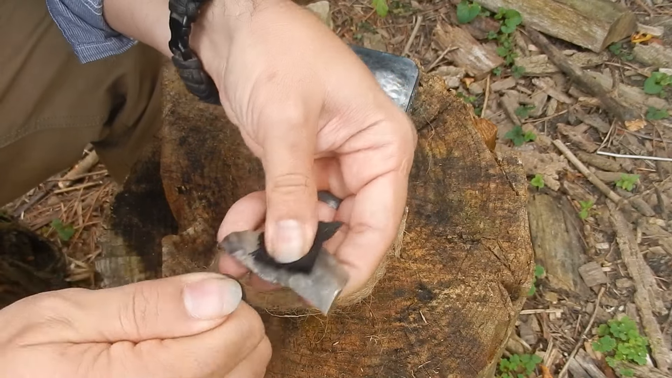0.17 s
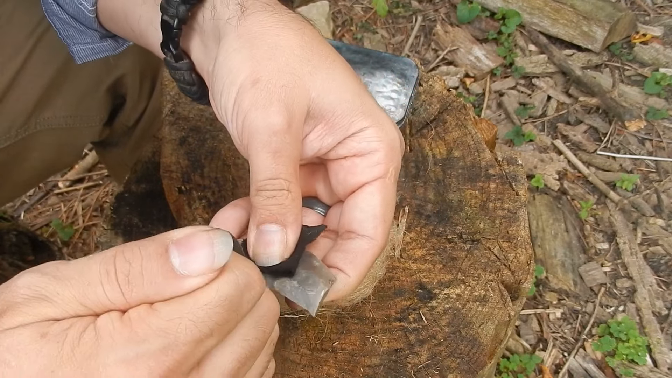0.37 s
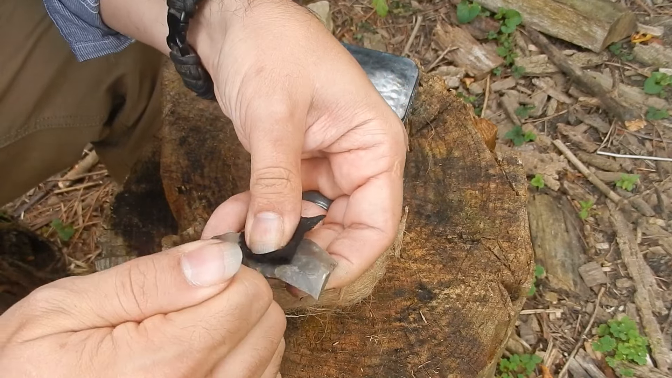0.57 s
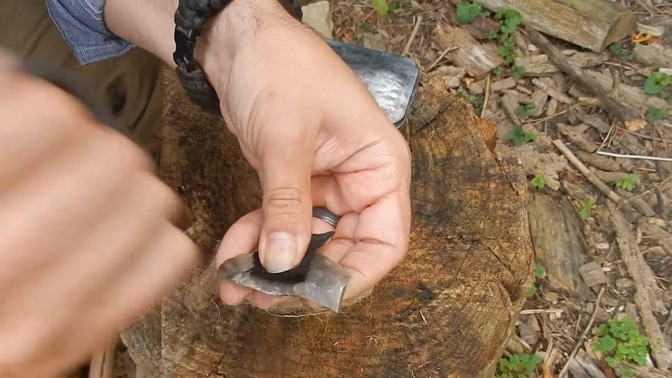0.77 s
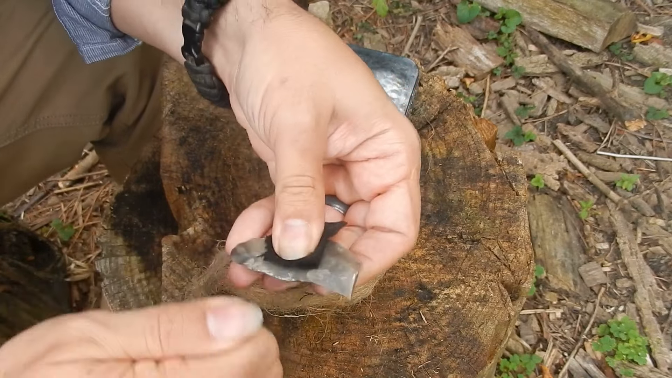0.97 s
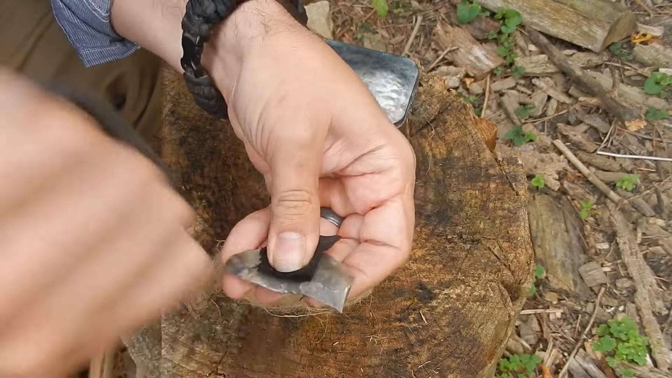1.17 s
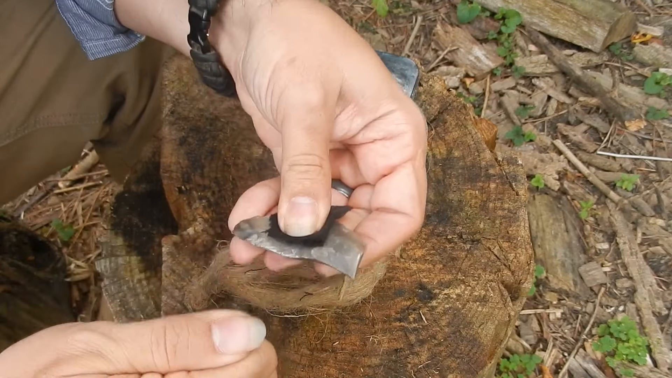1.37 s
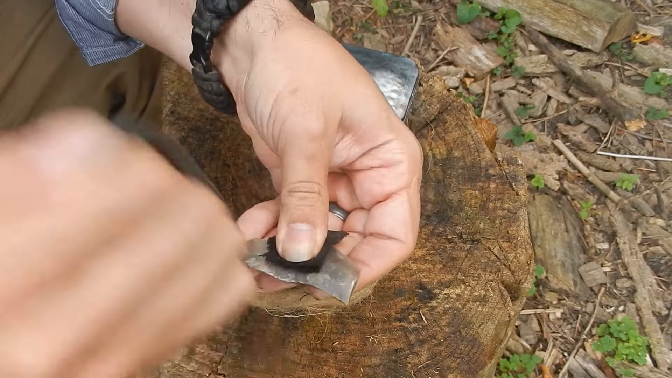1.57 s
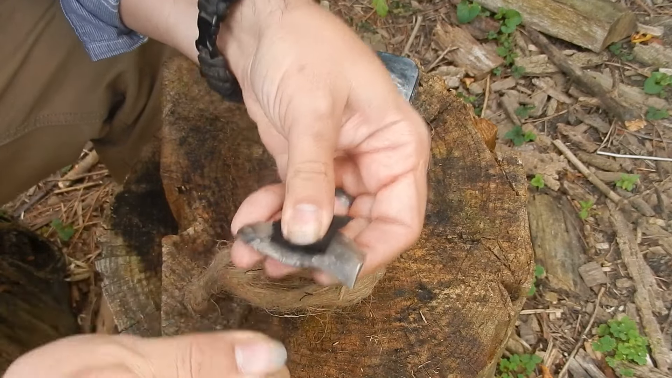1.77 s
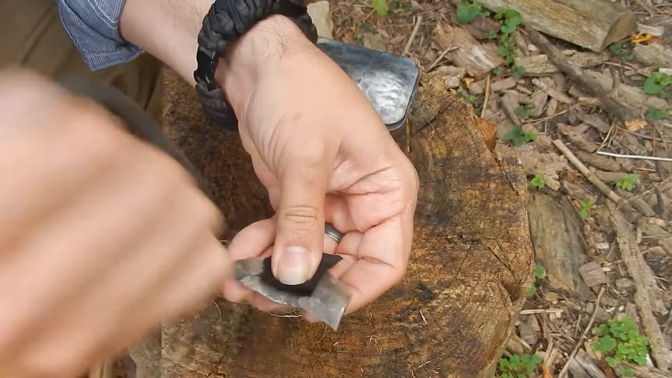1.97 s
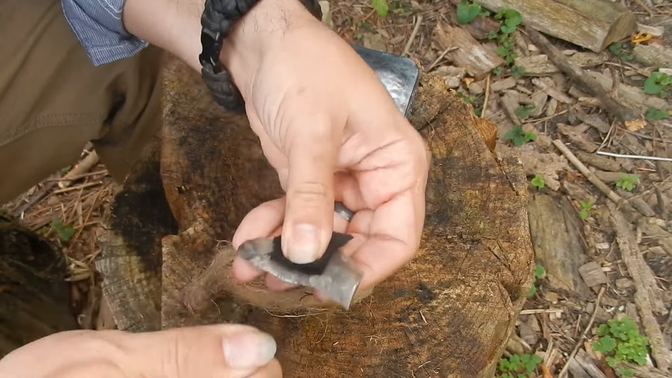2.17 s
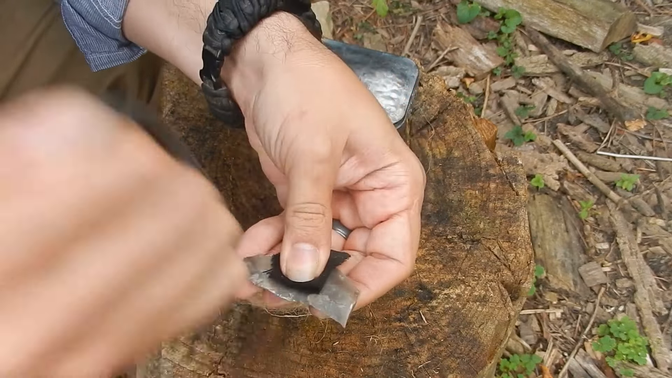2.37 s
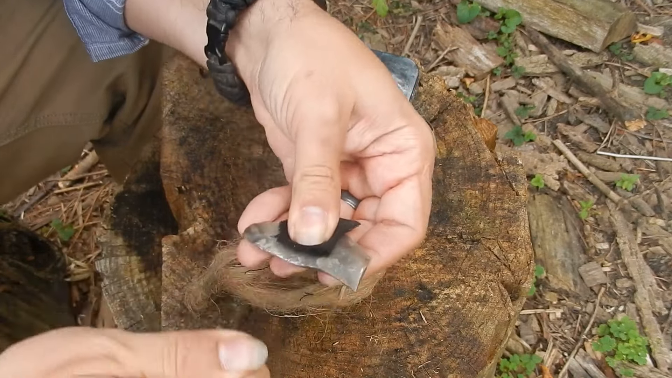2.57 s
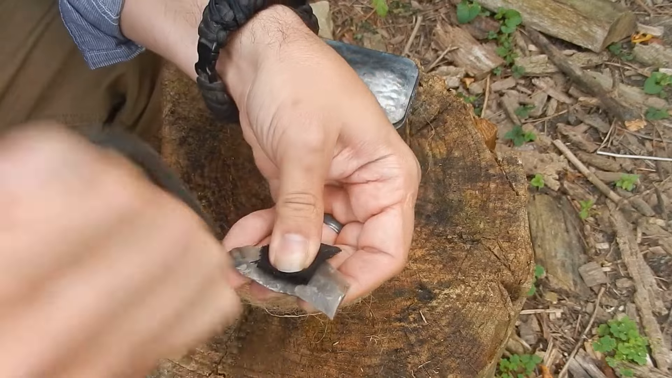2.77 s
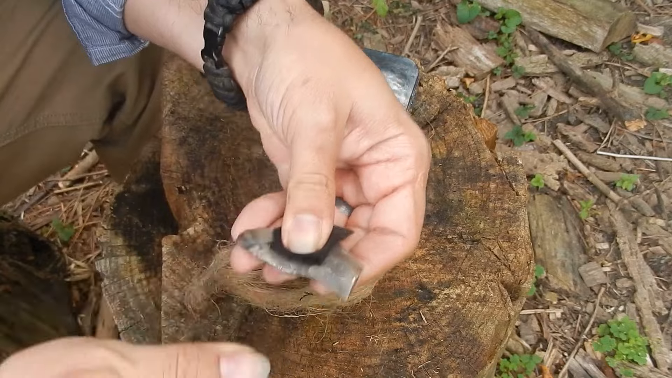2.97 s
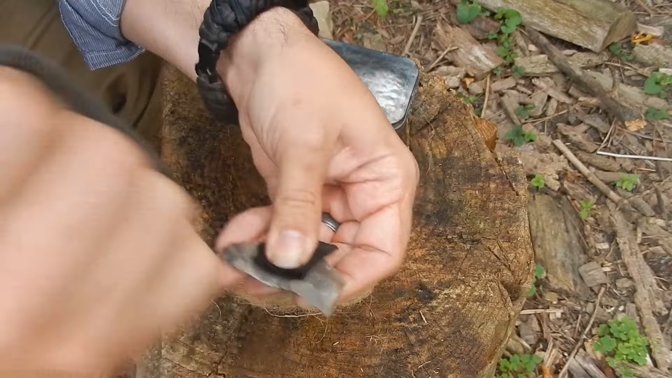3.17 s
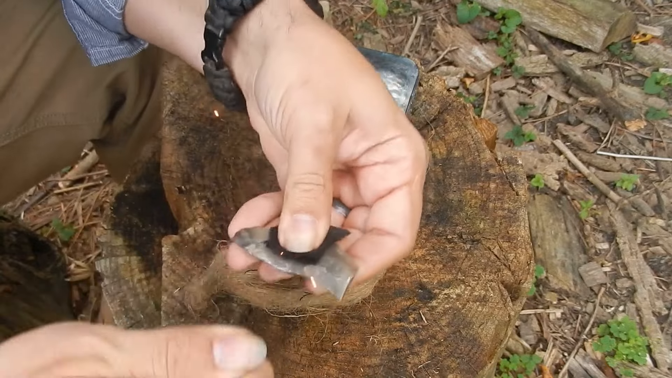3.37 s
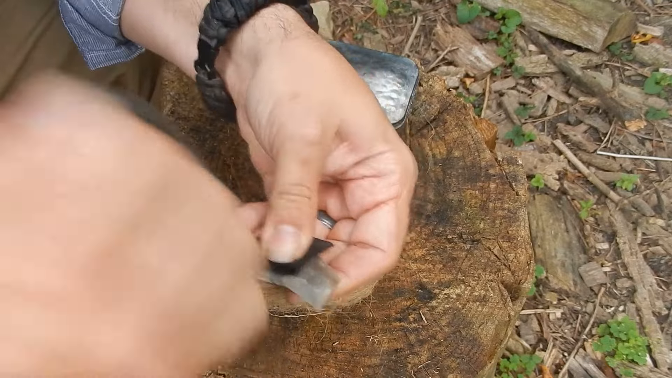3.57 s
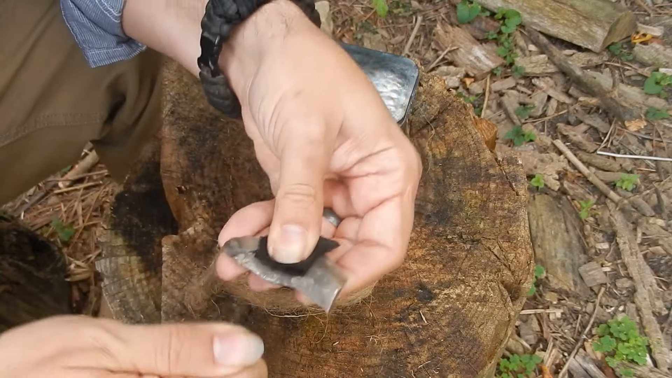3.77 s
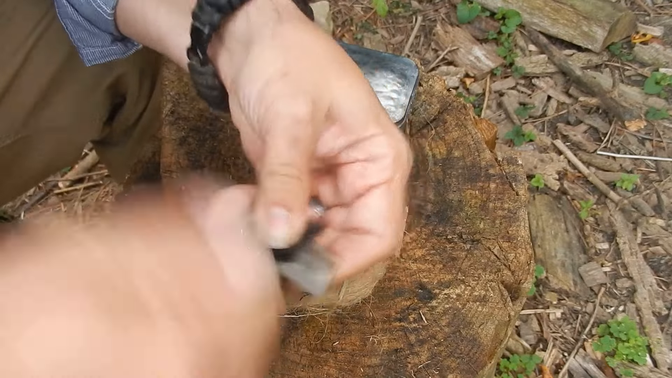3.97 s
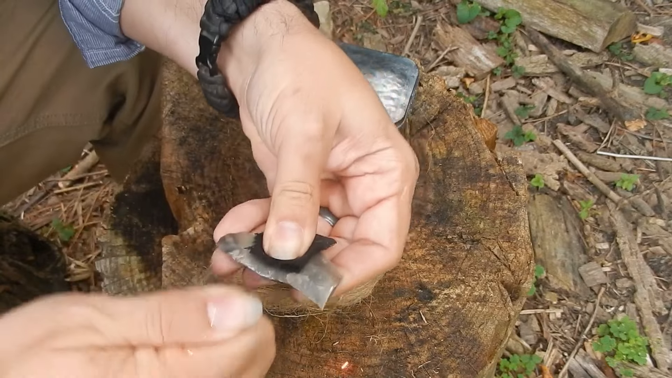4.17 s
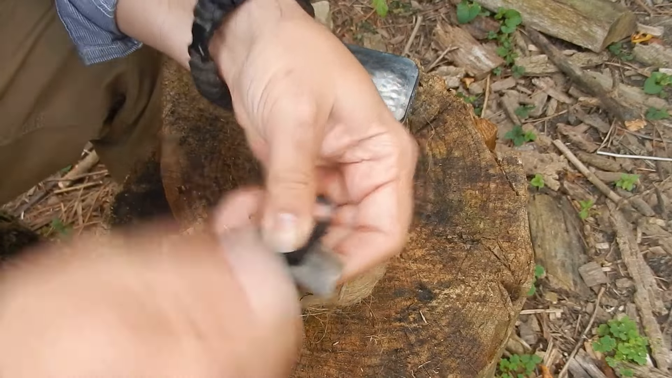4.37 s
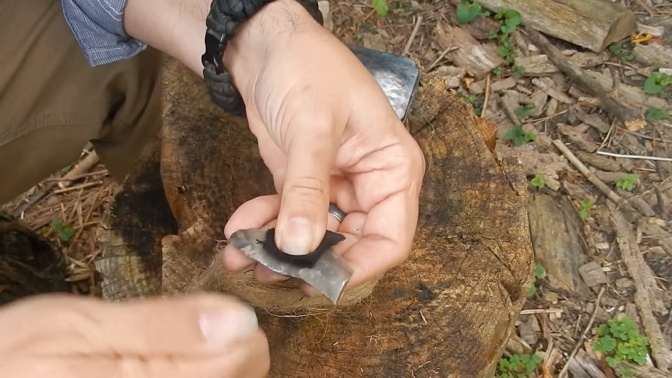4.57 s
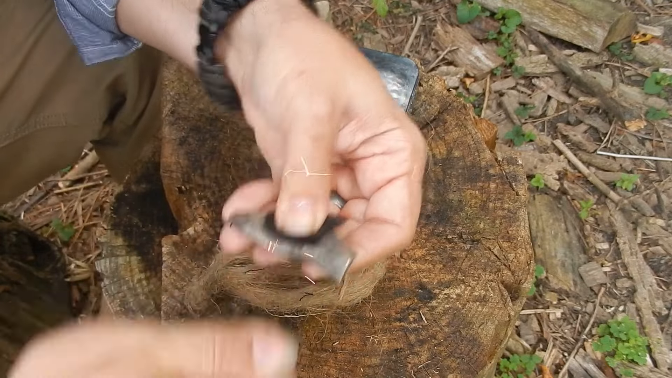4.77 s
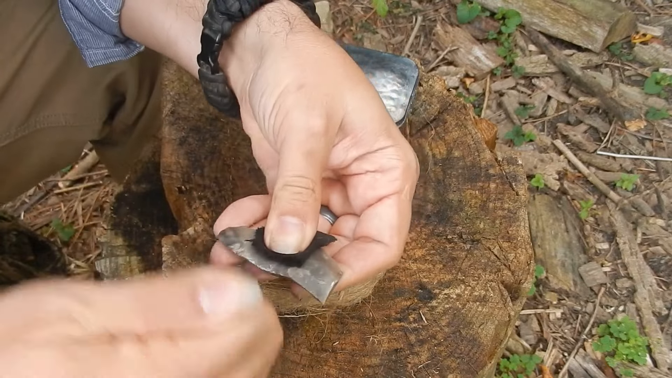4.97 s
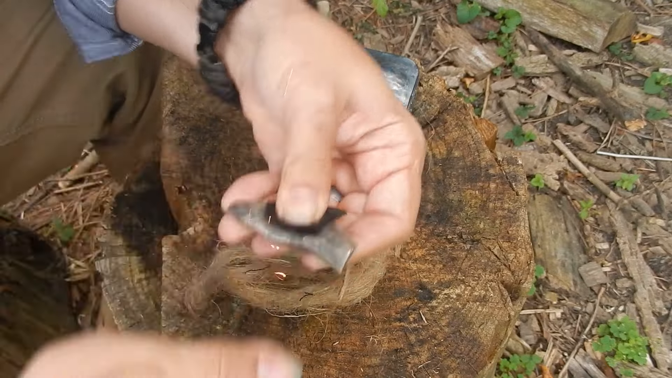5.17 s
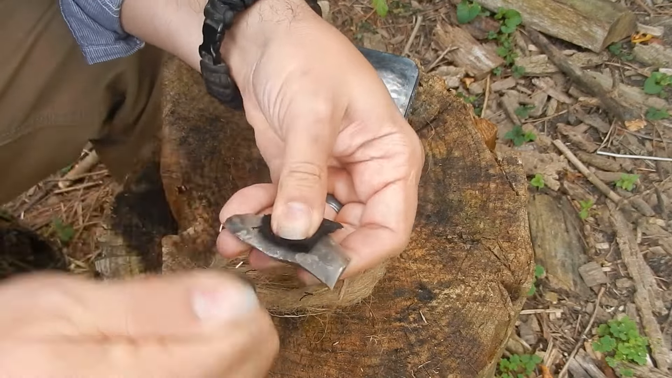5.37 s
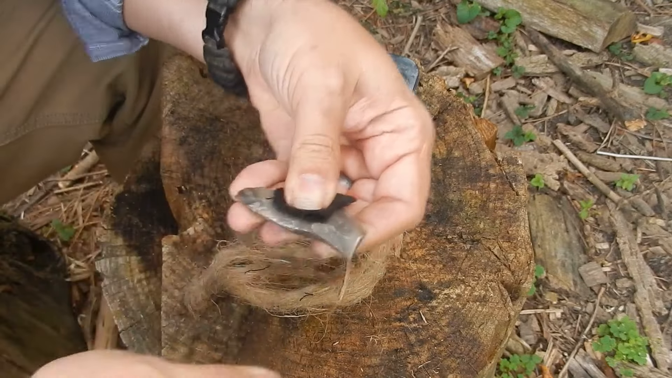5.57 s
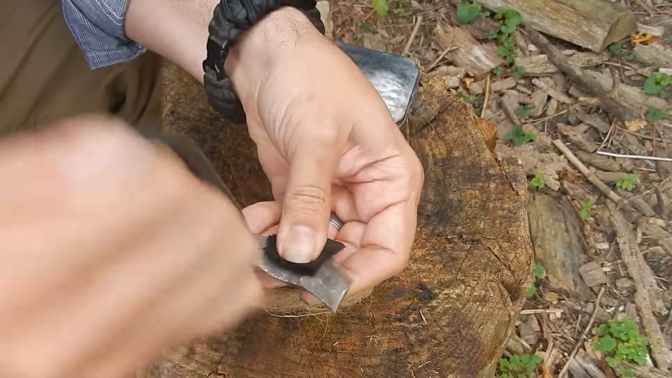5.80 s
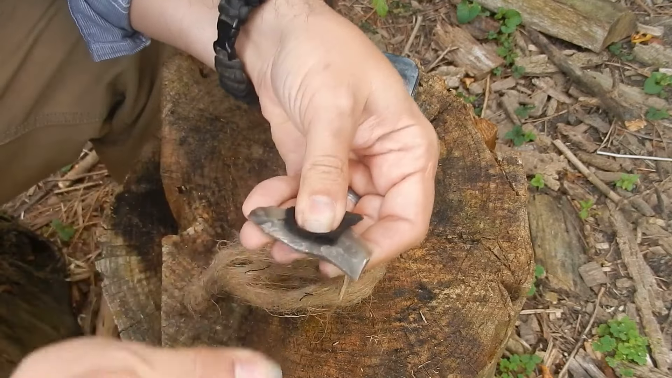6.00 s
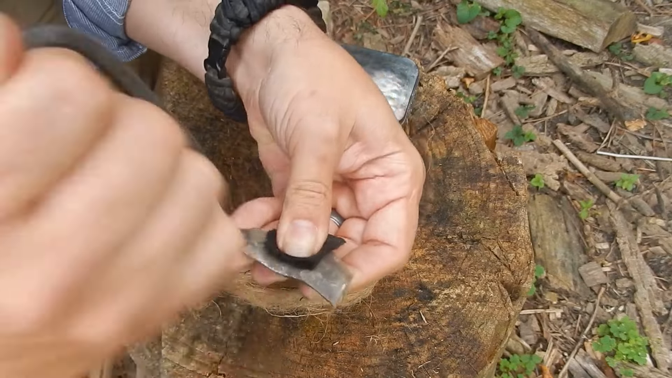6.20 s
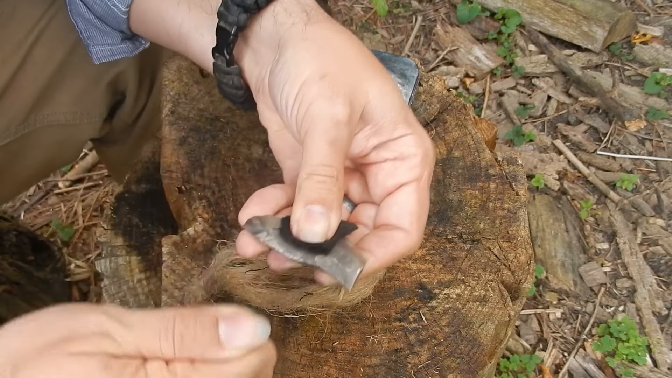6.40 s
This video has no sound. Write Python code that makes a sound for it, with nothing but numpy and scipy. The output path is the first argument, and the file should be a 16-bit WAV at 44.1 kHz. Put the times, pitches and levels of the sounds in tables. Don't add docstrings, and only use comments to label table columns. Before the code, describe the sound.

Sharp stone-and-metal clicks, captured close on a phone in a wood, start immediately, pause for small dull ticks, then continue evenly to the end. Fingers choke the ring within milliseconds, leaving a short gritty tail. Quiet cricket chirps, airy hiss and a distant low motor drone sit far below; the drone wavers and sinks slightly. Later, very high insect rasps join in short bursts.

```python
import sys
import numpy as np
from scipy import signal
from scipy.fft import rfft, irfft, next_fast_len
from scipy.io import wavfile
from scipy.ndimage import uniform_filter1d

SR = 44100
rng = np.random.default_rng(int(sys.argv[2]) if len(sys.argv) > 2 else 0)


def store_wav(level_fs):
    pcm = np.round(np.clip(np.atleast_2d(level_fs), -1, 1) * 32767)
    wavfile.write(sys.argv[1], SR, pcm.T.astype(np.int16))


def magnitude_from_level(level_db):
    exponent = np.asarray(level_db, float) / 20
    return 10 ** exponent


N = 283915
TREBLE_LAG_S = .0102


def band(x, lo_hz, hi_hz):
    return signal.sosfilt(signal.butter(4, [lo_hz, hi_hz], "bandpass", fs=SR, output="sos"), x)


def shape(noise, points):
    hz, db = np.transpose(points)
    size = noise.shape[-1]
    log_hz = np.log(np.fft.rfftfreq(size, 1 / SR) + 1)
    weight = magnitude_from_level(np.interp(log_hz, np.log(hz), db, -90, -90))
    out = irfft(weight * rfft(noise), size)
    return out / np.std(out)


def ports(pan_db):
    return magnitude_from_level(np.array([[pan_db], [-pan_db]]) / 2)


def walk(rate_hz):
    k = int(SR / rate_hz)
    steps = np.repeat(rng.standard_normal(N // k + 1), k)
    return 1.3 * uniform_filter1d(uniform_filter1d(steps, k), k)[:N]


def curve(rows):
    return np.interp(np.arange(N) / SR, *np.transpose(rows))


def add(mix, s, sound):
    i = int(s * SR)
    part = sound[:, max(-i, 0):N - i]
    mix[:, max(i, 0):max(i, 0) + part.shape[1]] += part


def colour(points, unlike, unlike_top_hz, pan_db):
    mid, side = shape(rng.standard_normal((2, next_fast_len(N))), points)[:, :N]
    side = unlike * band(side, 25, unlike_top_hz)
    return np.array([mid + side, mid - side]) * ports(pan_db)


# pitch_hz [Hz], level_db [dB per Hz]
INSECT_HISS = [(2500, -48.5), (3800, -20), (4200, -13), (4600, -8.5), (5300, -11.5), (5800, -9), (6500, -5),
               (7100, -7.5), (7800, -5.5), (8400, -13), (9500, -17), (11000, -22.5), (14000, -56)]
# pitch_hz [Hz], level_db [dB per Hz]
HIGH_AIR = [(7000, -36), (9500, -10.5), (11000, 1), (15800, -0.5), (16000, -44.5)]
# pitch_hz [Hz], level_db [dB per Hz]
FAR_TRAFFIC = [(140, -33), (240, -16.5), (280, -4.5), (359, -12), (472, -11.5), (578, -9), (1250, -8.5),
               (2430, -18.5), (3820, -21), (4100, -13), (5330, -45), (9020, -120)]
# pitch_hz [Hz], level_db [dB per Hz]
LOW_RUMBLE = [(20, -34), (40, -13.5), (60, -7), (85, -1.5), (130, -13), (200, -14), (300, -26.5)]


def wood():
    hiss = magnitude_from_level(-61 + .5 * walk(20)) * colour(INSECT_HISS, .45, 6600, 0.)
    air = magnitude_from_level(-76.5 + .6 * walk(15)) * shape(rng.standard_normal(next_fast_len(N)), HIGH_AIR)[:N]
    traffic = magnitude_from_level(-64 + .6 * walk(14)) * colour(FAR_TRAFFIC, 0.31, 4000, 1.6)
    rumble = magnitude_from_level(-55.5 + 1.5 * walk(8)) * colour(LOW_RUMBLE, 0.22, 300, 2.6)
    return hiss + air + traffic + rumble


# start_s [s], rate_hz [Hz]
SHAFT_RATE = [(0, 58.3), (.35, 57.33), (.57, 58.34), (1.2, 54.82), (2.5, 55.34), (3.3, 55.5), (4.75, 54.75),
              (5.5, 52.93), (5.75, 50.88), (6.2, 49), (6.44, 50.7)]
# start_s [s] (centre), level_db [dB before gain control], half_width_s [s]
SWELLS_TWICE = [(.08, -53.5, 0.21), (.39, -47, 0.062), (.6, -44, .11), (.86, -49, 0.051),
                (1.13, -38.5, 0.21), (1.5, -42.5, 0.17), (1.66, -41, 0.031), (1.92, -50.5, 0.11),
                (2.4, -43, 0.45), (2.87, -42.5, 0.064), (3.07, -37, 0.088), (3.6, -38, 0.23),
                (4.0, -42, 0.28), (4.47, -38.5, 0.12), (4.72, -41.5, 0.08), (4.95, -47.5, .13),
                (5.15, -49.5, 0.074), (5.42, -45, 0.16), (5.83, -47.5, .05), (6.15, -52.5, 0.13),
                (6.36, -43.5, 0.12)]
# start_s [s] (centre), level_db [dB before gain control], half_width_s [s]
SWELLS_THRICE = [(.12, -57.5, 0.048), (.35, -55, 0.065), (.6, -52.5, 0.08), (.85, -54, 0.11),
                 (1.0, -54, 0.045), (1.24, -52, 0.12), (1.47, -52.5, 0.051), (2.31, -50.5, 0.065),
                 (2.75, -58, 0.094), (3.08, -54.5, .06), (3.24, -52.5, 0.037), (3.55, -52, 0.079),
                 (3.88, -49, .16), (4.33, -47, 0.16), (4.76, -48, 0.072), (5.15, -56.5, 0.077),
                 (5.68, -58.5, 0.048), (5.84, -60, 0.053), (6.18, -55.5, 0.29), (6.42, -51, 0.061)]
# start_s [s] (centre), level_db [dB before gain control], half_width_s [s]
SWELLS_FOURFOLD = [
    (.78, -66.5, .055),
    (1.5, -57, 0.038),
    (2.87, -49, 0.013),
    (4.6, -57, 0.2),
    (5.5, -62.5, .07),
    (5.9, -52, 0.081),
    (6.2, -49.5, 0.17),
]


def engine():
    t = np.arange(N) / SR
    turn = 2 * np.pi * np.cumsum(curve(SHAFT_RATE) * (1 + 0.0048 * walk(25))) / SR
    hum = 0
    for k, swells in enumerate((SWELLS_TWICE, SWELLS_THRICE, SWELLS_FOURFOLD)):
        level = sum(magnitude_from_level(db) * np.exp(-((t - s) / half_s) ** 2) for s, db, half_s in swells)
        flicker = magnitude_from_level(1.1 * walk(41))
        hum = hum + np.sqrt(2) * level * flicker * np.sin((k + 2) * turn + k)
    return hum * ports(2.2)


def cricket():
    mix, t = np.zeros((2, N)), np.arange(4000) / SR
    swell = np.clip(t / .008, 0, 1) * (np.exp(-(t / .06) ** 4) + .3 * np.exp(-(t / .075) ** 4))
    tone = np.sin(2 * np.pi * 6020 * t)
    first_s, every_s = -.003, .1983
    for k, s in enumerate(np.arange(first_s, N / SR, every_s)):
        flutter = 1 + .35 * np.sin(2 * np.pi * 95 * t + 6 * rng.random())
        weaker_db = k % 2 * -3.5
        level = magnitude_from_level(-58 + weaker_db + 1.7 * rng.standard_normal())
        add(mix, s - TREBLE_LAG_S, level * swell * flutter * tone * ports(.3))
    return mix


def far_cricket():
    turn = 2 * np.pi * np.cumsum(6440 * (1 + .002 * walk(60))) / SR
    level = magnitude_from_level(-79.5 + 4.5 * walk(5.9) + 3 * walk(44))
    return level * np.sin(turn) * ports(-1.5)


def contact(chips):
    chip_share, chip_s, low_hz = .3, .001, 950
    push = chip_share * chips * np.exp(-np.arange(len(chips)) / SR / chip_s)
    push[0] += 1
    return signal.sosfilt(signal.butter(2, low_hz, "high", fs=SR, output="sos"), push)


def ring(push, modes, peak_db, hold_s, pan_db, scatter_db):
    t = np.arange(len(push)) / SR
    choke = magnitude_from_level(-11 / (1 + np.exp(-np.clip((t - hold_s) / 0.00013, -30, 30))))
    out = 0
    for k, (hz, db, t60) in enumerate(modes):
        pole = np.exp(2j * np.pi * hz / SR - np.log(1000) / (max(t60, .002) * SR))
        mode = (-1) ** k * magnitude_from_level(db) * signal.lfilter([1], [1, -pole], push).imag
        out = out + mode * ports(pan_db + scatter_db * rng.standard_normal())
    return out * choke * magnitude_from_level(peak_db) / np.abs(out.mean(axis=0)).max()


# pitch_hz [Hz], level_db [dB per Hz]
GRIT_SPECTRUM = [(500, -40), (1200, -24), (2100, -21), (2700, -13), (3400, -17), (4300, 0), (5400, -6),
                 (6200, -4), (8500, -6), (10500, -16), (12000, -16), (13300, -11), (15000, -25),
                 (15800, -45)]


def scrape(db):
    t = np.arange(6000) / SR
    bands = magnitude_from_level(4.5 * np.interp(np.arange(3001), np.arange(0, 3001, 50), rng.standard_normal(61)))
    grit = irfft(bands * rfft(shape(rng.standard_normal((2, len(t))), GRIT_SPECTRUM)))
    patchy = magnitude_from_level(3 * np.interp(t, t[::60], rng.standard_normal(100))) * np.clip(t / .0015, 0, 1)
    fade = (np.exp(-t / .005) + magnitude_from_level(-20.5) * np.exp(-t / 0.026)) * patchy
    echo = magnitude_from_level(-22.5) * band(grit, 1500, 3800) * np.exp(-((t - .038) * 350) ** 2)
    mid, side = magnitude_from_level(db) * (grit * fade + echo)
    return np.array([mid + 0.24 * side, mid - 0.41 * side]) * ports(3.5)


# start_s [s], main_level_db [dB], main_pitch_hz [Hz], knock_level_db [dB], free_ring_s [s]
BLOWS_LOWER = [(0.0235, -1, 2776, -14.5, 0.0014), (0.8881, -5, 2575, -13, 0.0072),
               (1.285, -3.5, 2580, -13, 0.0043), (1.6763, -11.5, 2640, -22, 0.0048),
               (2.0752, -10.5, 2820, -30, 0.0031), (2.5016, -11, 2600, -17, 0.0041),
               (2.8747, -9.5, 2765, -24.5, 0.0056), (3.2483, -9, 2757, -19.5, 0.0031),
               (3.6307, -4, 2690, -23, 0.00092), (4.0112, -6.5, 2680, -17.5, 0.0021),
               (4.405, -7.5, 2600, -18.5, 0.0029), (4.7835, -2.5, 2680, -12.5, 0.0063),
               (5.1785, -6.5, 2680, -17, 0.0017), (5.5602, -4.5, 2617, -16.5, 0.008),
               (5.9347, -8, 2684, -14.5, 0.0058), (6.2895, -10.5, 2580, -19.5, 0.012)]
# steel_level_db [dB], steel_pitch_hz [Hz], stone_level_db [dB],
# spark_level_db [dB], overdrive_pop_db [dB]
BLOWS_UPPER = [(-9.5, 5930, -10.5, -23, -36.5), (-4, 6000, -16.5, -18.5, -24),
               (-5, 6200, -18.5, -20.5, -20), (-6.5, 6220, -23.5, -19, -38), (-9, 6600, -18, -22, -30.5),
               (-11, 6200, -15, -24, -22), (-13.5, 6440, -15, -23.5, -32.5),
               (-12.5, 6900, -20.5, -25.5, -25), (-24.5, 5800, -27.5, -22.5, -28.5),
               (-10, 6340, -16, -27, -29.5), (-7.5, 6150, -12, -27, -25), (-12.5, 6260, -19, -19, -29.5),
               (-10.5, 6210, -16, -22.5, -33.5), (-8.5, 6460, -8, -22, -33),
               (-11, 6460, -13.5, -30.5, -26.5), (-10, 6440, -9.5, -33.5, -31.5)]
# pitch_ratio [1], level_db [dB], t60_s [s]
MAIN_MODES = [(0.912, 7, 0.0088), (1, 6.5, 0.021), (1.149, 1, 0.014)]
# pitch_ratio [1], level_db [dB], t60_s [s]
STEEL_MODES = [(0.919, -1.5, 0.0034), (1.001, -0.5, 0.011), (1.091, -4, 0.0053)]
# pitch_hz [Hz], level_db [dB], t60_s [s]
KNOCK_MODES = [(1120, -8, .006), (1532, 8.5, 0.0089), (1951, 2, 0.018)]
# pitch_hz [Hz], level_db [dB], t60_s [s]
EDGE_MODES = [(3868, -5, 0.054), (3260, -7.5, 0.018)]
# pitch_hz [Hz], level_db [dB], t60_s [s]
STONE_MODES = [(4300, 0, .022), (4750, -2, .011), (5200, -3, .009), (5600, -6, .006)]
# pitch_hz [Hz], level_db [dB], t60_s [s]
CHIP_MODES = [(7816, 2.5, 0.004), (8610, -9, 0.033), (9020, -3.5, 0.0063), (10160, -8, 0.0065),
              (11140, -3.5, 0.0037)]
# pitch_hz [Hz], level_db [dB], t60_s [s]
SPARK_MODES = [(12400, -5.5, 0.0046), (12960, 1, 0.0096), (14500, -7.5, .003), (15500, -5.5, 0.0019)]


def blows():
    mix = np.zeros((2, N))
    for lower, upper in zip(BLOWS_LOWER, BLOWS_UPPER):
        s, main_db, main_hz, knock_db, hold_s = lower
        steel_db, steel_hz, stone_db, spark_db, pop_db = upper
        push = contact(rng.standard_normal(3000))

        main_modes = [(ratio * main_hz, db, t60) for ratio, db, t60 in MAIN_MODES]
        body = ring(push, main_modes, main_db, hold_s, 0.54, 1.0)
        knock = ring(push, KNOCK_MODES, knock_db, hold_s, 0.4, 0.606)
        edge = ring(push, EDGE_MODES, knock_db + 3, hold_s, 8.0, .6)
        add(mix, s, body + knock + edge)

        upper_hold_s = 0.0029
        grip = 1 + .02 * rng.standard_normal()
        steel_modes = [(ratio * steel_hz, db, t60) for ratio, db, t60 in STEEL_MODES]
        stone_modes = [(hz * grip, db, t60) for hz, db, t60 in STONE_MODES]
        steel = ring(push, steel_modes, steel_db, upper_hold_s, 3.9, 1.7)
        stone = ring(push, stone_modes, stone_db, upper_hold_s, 6.5, 1.8)
        chips = ring(push, CHIP_MODES, -9.5 + 0.4 * stone_db, upper_hold_s, 1.9, 1.4)
        sparks = ring(push, SPARK_MODES, spark_db, upper_hold_s, 1.2, 6.6)
        add(mix, s + .0003, steel + stone + chips + sparks)
        add(mix, s, scrape(-22.5 + 0.11 * (max(steel_db, stone_db) + 8.5)))

        pop = magnitude_from_level(pop_db + 3) * np.hanning(18) * ports(0.7 + 8 * rng.standard_normal())
        add(mix, s + TREBLE_LAG_S + 0.00096, pop)
    return mix


# start_s [s], lower_level_db [dB], upper_level_db [dB]
LIGHT_TOUCHES = [
    (0.2844, -61, -51),
    (0.3678, -40.5, -33.5),
    (0.46, -46.5, -59),
    (0.5075, -46, -53),
    (0.55, -52, -60),
    (0.598, -60, -67),
    (0.627, -67, -54),
    (0.682, -46.5, -59),
]


def touches():
    mix = np.zeros((2, N))
    for s, low_db, high_db in LIGHT_TOUCHES:
        push = contact(rng.standard_normal(900))
        add(mix, s, ring(push, [(2680, -19.0, 0.023), (1500, -17, 0.0028)], low_db + 5.0, 0.0033, 2.2, .6))
        add(mix, s, ring(push, STONE_MODES[1:], high_db, 0.0012, 2.1, .6))
    return mix


def stump_echo(direct):
    echo = np.pad(direct, ((0, 0), (int(.000945 * SR), 0)))[:, :N]
    dull = signal.sosfilt(signal.butter(1, 7000, fs=SR, output="sos"), echo)
    return np.array([[-.2], [.22]]) * dull


# start_s [s], level_db [dB]
BUSH_CRICKET_RASPS = [(3.921, -66.5), (4.1176, -67.5), (4.2098, -58), (4.299, -79), (5.1083, -59),
                      (5.3177, -61.5), (5.432, -58), (5.5405, -60.5), (5.6487, -61), (5.75, -60),
                      (5.8502, -55), (6.0684, -83.5), (6.1569, -59), (6.2628, -57), (6.3594, -54)]


def bush_cricket():
    mix, t = np.zeros((2, N)), np.arange(4000) / SR
    swell = np.clip(t / .003, 0, 1) * np.exp(-(t / .036) ** 3)
    for s, db in BUSH_CRICKET_RASPS:
        rasp = band(rng.standard_normal(4000), 10500, 15300) * swell
        add(mix, s - TREBLE_LAG_S, magnitude_from_level(db - 6) * rasp * np.ones((2, 1)))
    return mix


# start_s [s], gain_db [dB]
PHONE_GAIN = [(0, -1), (.29, 1.5), (.66, 8.5), (.88, 11.5), (.92, -0.5), (1.15, 2), (1.28, 3.5),
              (1.33, -7.5), (1.5, -3.5), (1.8, -7), (2.44, -2), (2.69, -3.5), (4.23, 0), (4.77, 4.5),
              (4.83, -3.5), (5.33, 1), (5.7, 2), (6.44, 2)]


def scene():
    background = wood() + engine() + cricket() + far_cricket() + bush_cricket()
    direct = blows() + touches()
    return direct + stump_echo(direct) + magnitude_from_level(curve(PHONE_GAIN)) * background


def blur(x, reach_s, before_db, after_db):
    size = int(2 * reach_s * SR) + 1
    spread = magnitude_from_level(np.where(np.arange(size) < size / 2, before_db, after_db)) / np.sqrt(size)
    return signal.fftconvolve(x, spread * rng.standard_normal((1, size)), "same")


def band_limit(x):
    return signal.sosfilt(signal.butter(12, 16810, fs=SR, output="sos"), x)


def record(dry):
    split_hz = 4020
    low = signal.fftconvolve(dry, signal.firwin(151, split_hz, fs=SR)[None], "same")
    high = np.roll(dry - low, int(TREBLE_LAG_S * SR), axis=1)
    smear = blur(band(low, 900, 4000), TREBLE_LAG_S, -20.5, -12)
    low = np.tanh(low + smear)
    low = signal.fftconvolve(low, signal.firwin(151, 4300, fs=SR)[None], "same")
    both = low + high + blur(high, .005, -31, -28)
    both = signal.sosfilt(signal.ellip(8, .2, 70, 16500, fs=SR, output="sos"), both)
    return band_limit(both)


dry = scene()
out = record(dry)
store_wav(out)
```